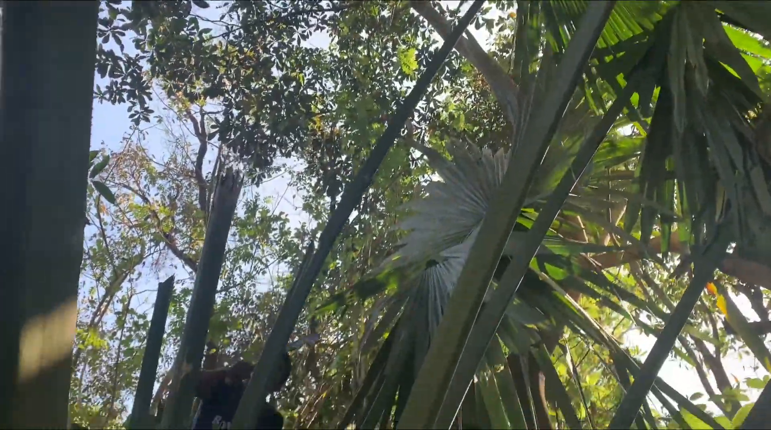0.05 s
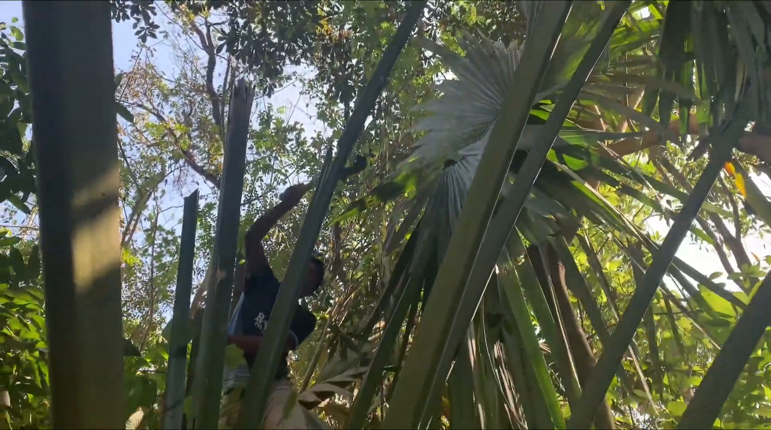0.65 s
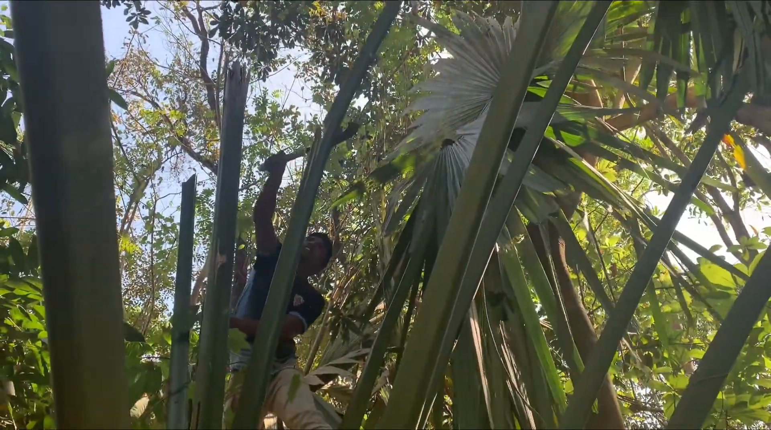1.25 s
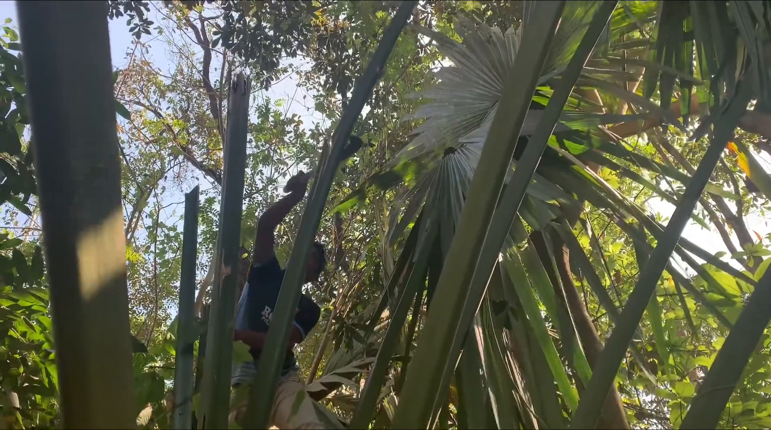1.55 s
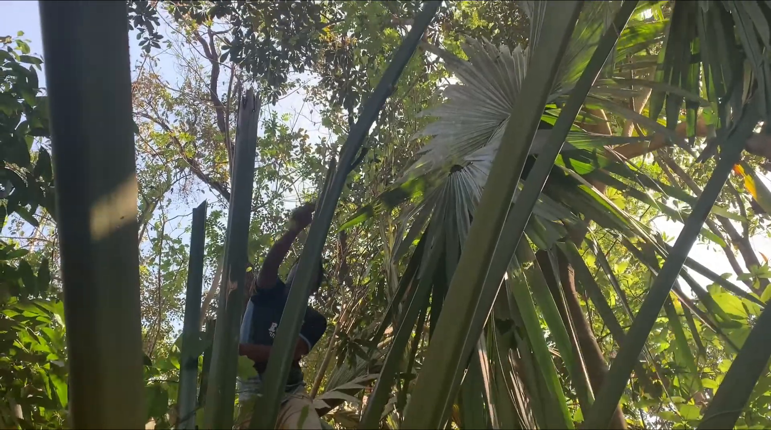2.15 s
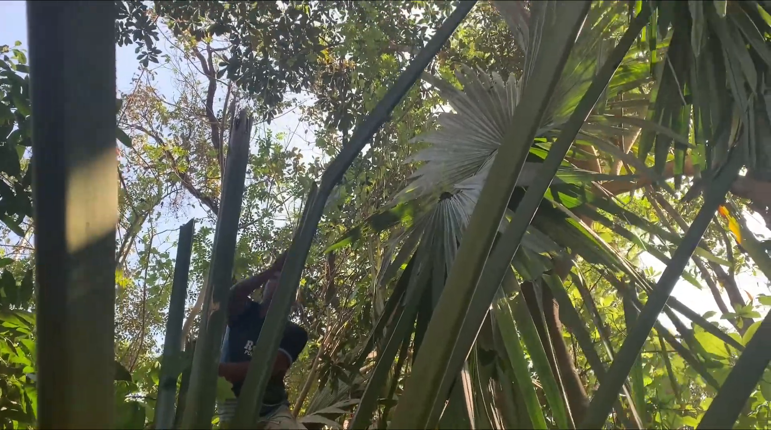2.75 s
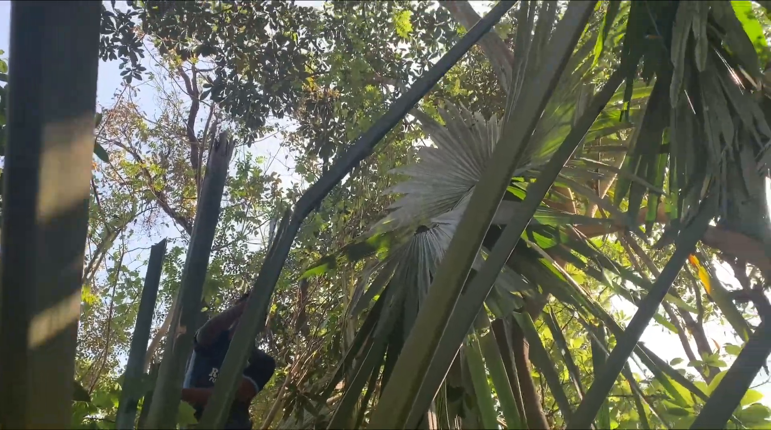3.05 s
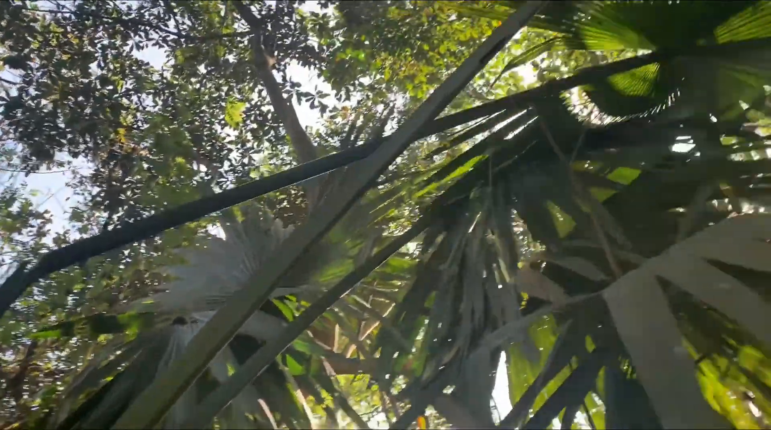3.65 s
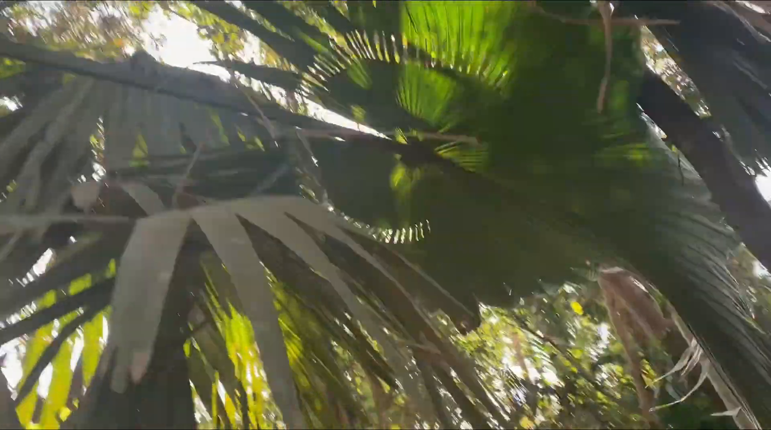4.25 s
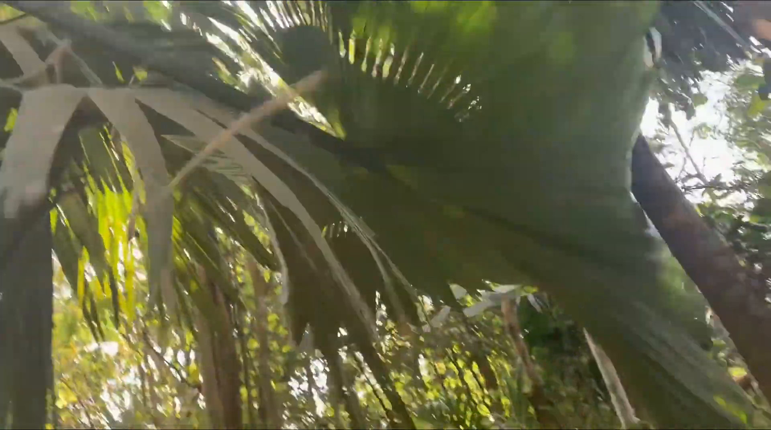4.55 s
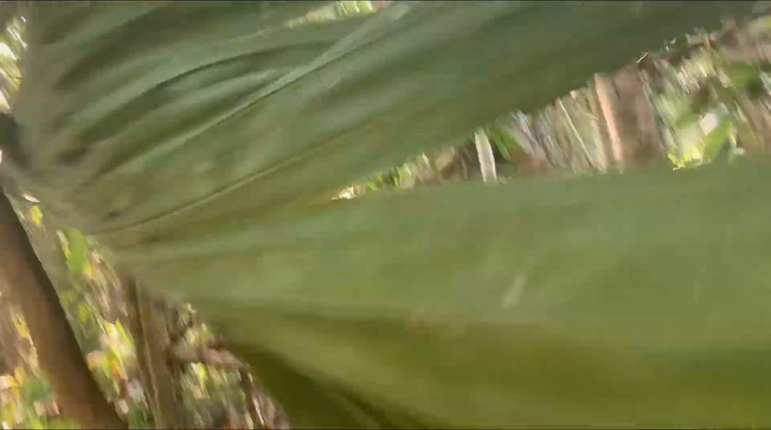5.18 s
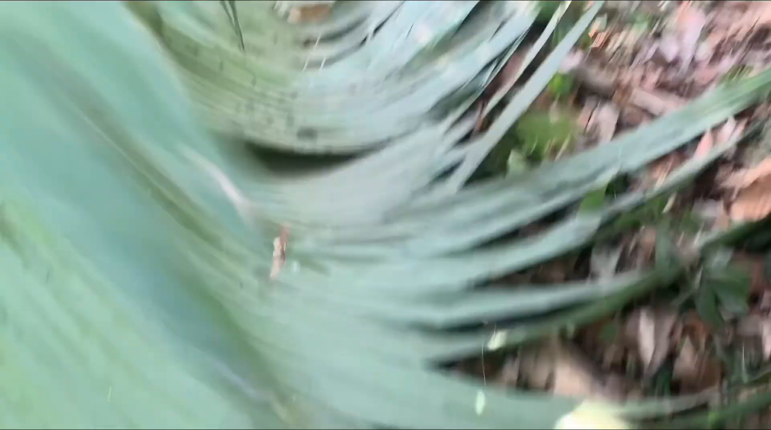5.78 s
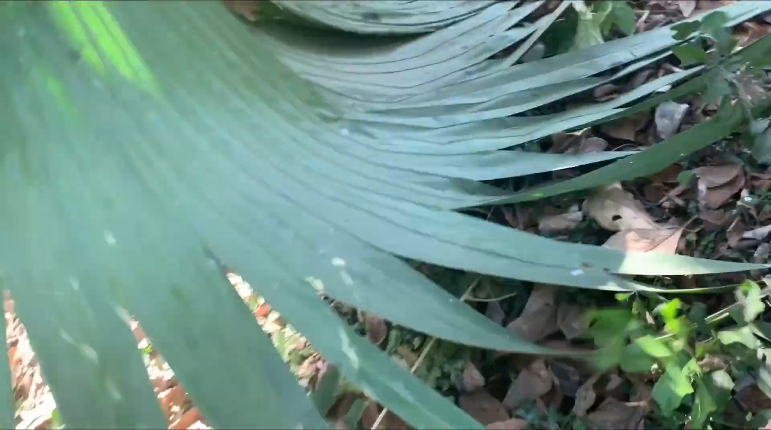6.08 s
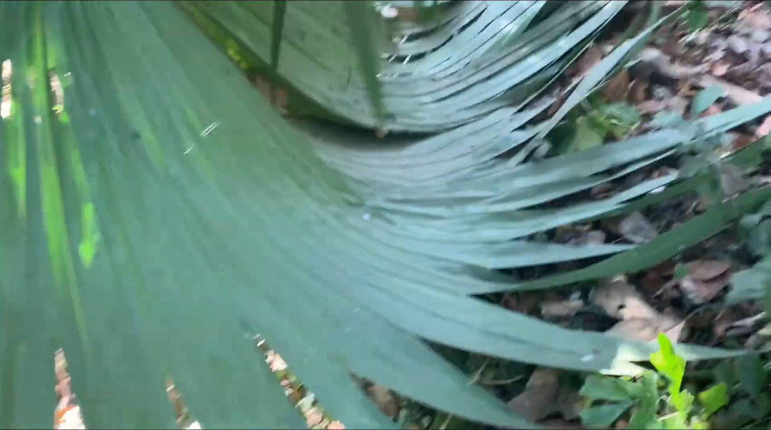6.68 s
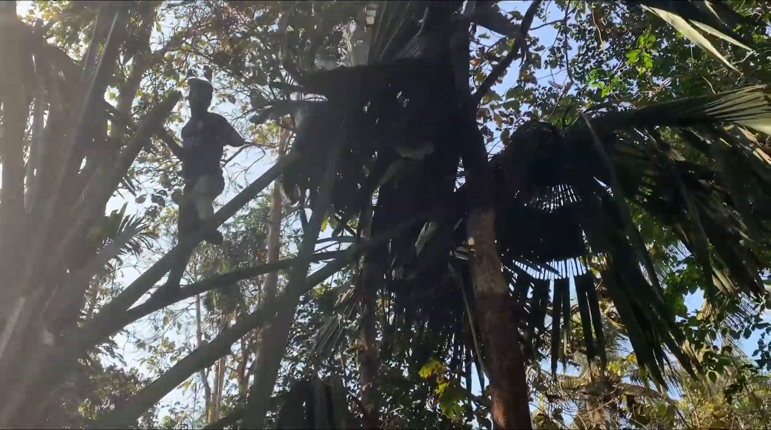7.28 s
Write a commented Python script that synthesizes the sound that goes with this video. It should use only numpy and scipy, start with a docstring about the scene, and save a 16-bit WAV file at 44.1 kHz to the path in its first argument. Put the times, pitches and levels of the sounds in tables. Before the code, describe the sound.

Woody chops and snapping fibres in a forest, then a large palm leaf crashes down through dry fronds close by.

```python
"""Leaves stir and woody knocks grow into a hard chop: someone up a fan palm is cutting a leaf stalk.
The main chops open with a crack of fibres, then a thud; the stalk tears and the big frond falls.
It scrapes down through the dry crown, sweeps past the microphone with puffs of air and settles.
After a brief silence another frond starts to slide. Behind it all lie a light breeze and the low
hum of the forest, with one thin, far-off note near the start."""
import sys
import numpy as np
from scipy import signal
from scipy.fft import rfft, irfft
from scipy.io import wavfile
from scipy.ndimage import uniform_filter1d

SR = 44100
rng = np.random.default_rng(int(sys.argv[2]) if len(sys.argv) > 2 else 0)


def to_wav(s):
    """Save 16-bit WAV."""
    ch = np.atleast_2d(s).T  # columns
    pcm = np.round(np.clip(ch, -1, 1) * 32767)  # PCM
    wavfile.write(sys.argv[1], SR, pcm.astype(np.int16))


N = 327222
TIME = np.arange(N) / SR
BINS = np.fft.rfftfreq(N, 1 / SR)


# blows on the stalk: (time [s], level [dB], pitch [factor], soft-blow roll-off [Hz],
# ring time [factor], mode damped because the blow lands on its node [Hz])
BLOWS = [(0.016, -25.5, 1.07, 535, 0.75, 1150), (0.62, -11.5, 1.054, 316, 0.77, 296),
         (1.296, -0.5, 1.054, 2000, 0.6, 370), (1.601, -30, 1.06, 1500, 0.91, 1150),
         (1.91, -29, 1.09, 1200, 1, 1150), (1.962, -31.5, 1.67, 1500, 0.58, 1150),
         (2.022, -18.5, 0.71, 610, 0.67, 1150), (2.308, -22.5, 1.2, 1500, .9, 1150),
         (2.353, -17, 0.94, 1400, 0.59, 284), (2.398, -15.5, 1.13, 810, 0.58, 192),
         (2.607, -20, 1.35, 2700, 0.52, 1150), (2.634, -13, 1.08, 2500, 0.53, 1150),
         (3.348, -19, 1.18, 2500, 0.76, 1150), (4.239, -14.5, 1.02, 2000, 0.43, 1150)]
# bending modes of the stalk: (base pitch [Hz], level [dB], base t60 [s])
STALK_MODES = [(95.8, 1, 0.14), (117.2, -10, 0.28), (185, 1.5, 0.12), (287, 3, 0.073), (356, -1.5, 0.057),
               (459.6, -7, 0.09), (645, -8.5, 0.033), (1130, -23, 0.042)]
# the chops sit slightly right; rows left, right: (gain [dB])
CHOP_PAN_DB = [
    [-1.5],
    [1.5],
]
def chops(travel_s=0.00423, rise_s=0.0035, reference_hz=200):
    """Each blow bends the stalk; high bending waves travel faster, so the thud sweeps downward."""
    thuds, t = np.zeros(N), TIME[:SR // 2]
    for start, db, pitch, soft_hz, ringing, node_hz in BLOWS:
        for hz, mode_db, t60 in STALK_MODES:
            height = hz * pitch / reference_hz
            age = np.maximum(t - travel_s / np.sqrt(height), 0)
            attack = 1 - np.exp(-(age * height / (2 * rise_s)) ** 2)
            fade = amp(db + mode_db - 60 * age / (t60 * ringing))
            softness = 1 / np.sqrt(1 + (hz / soft_hz) ** 6)
            node_dip = 1 - .75 * np.exp(-(np.log2(hz / node_hz) / .2) ** 2)
            tone = np.sin(2 * np.pi * hz * pitch * age)
            add(thuds, start, attack * fade * softness * node_dip * tone)
    mid, side = forest_echo(np.array([thuds, np.zeros(N)]), wet_db=-13)
    return np.array([mid + side / 2, mid - side / 2]) * amp(CHOP_PAN_DB)


# fibres breaking: (time [s], level [dB], decay [s], woody ring against that level [dB])
FIBRE_SNAPS = [(0.61, -31.5, 0.013, -5), (1.284, -30, 0.003, -6), (1.2874, -12.5, 0.0052, -11.5),
               (1.298, -27.5, 0.033, -4.5), (1.711, -29, 0.0035, -7.5), (1.858, -37, 0.0025, -3),
               (1.957, -30, 0.0025, -5), (2.023, -9.5, 0.00067, -6), (2.107, -27.5, 0.0039, -4),
               (2.144, -32, 0.0053, -9), (2.274, -36, 0.0045, -4), (2.2805, -19, 0.0016, -9),
               (2.293, -34, 0.0061, 1), (2.302, -22, 0.01, -4.5), (2.344, -22, 0.002, -20),
               (2.393, -8, 0.00054, -14), (2.4105, -17, 0.0012, -39), (2.442, -30, 0.0033, -17),
               (2.5423, -19.5, 0.00089, -3), (2.6001, -14.5, 0.00094, -2), (2.6288, -18, 0.0028, 0),
               (2.636, -26, 0.0017, -3), (2.651, -19, 0.002, -9), (2.66, -21, 0.0071, -14),
               (2.684, -15, 0.0028, -23), (2.722, -20, .0015, -15), (2.727, -29, 0.0084, -7),
               (2.753, -22, 0.00087, -14), (2.775, -23.5, 0.006, -14), (2.844, -18, 0.0023, -29),
               (3.348, -9, 0.0015, -6), (3.574, -14.5, 0.0042, -35), (3.655, -20, 0.0025, -10),
               (3.745, -17.5, 0.0085, -27), (3.798, -17.5, 0.0032, -19), (3.8428, -7.5, 0.0023, -6),
               (3.8458, -12.5, 0.012, -13), (3.849, -12, 0.0013, -9), (3.9497, -18.5, 0.0064, -9),
               (4.2782, -6.5, 0.003, -8.5), (4.283, -13.5, 0.0028, -6), (4.296, -11, 0.0016, -5),
               (4.3368, -18, 0.0026, -3), (4.797, -17, 0.0076, -2.5), (6.3167, -19.5, .002, -11),
               (6.38, -19, 0.0041, -16), (6.5073, -19, .002, -4), (6.595, -15, 0.0021, -3.5),
               (6.78, -18, 0.0054, -16), (6.818, -21, 0.0022, -8), (7.011, -34, 0.0043, 21.5)]
# EQ of the bright crack and of its woody body: (frequency [Hz], level [dB])
CRACK_EQ = [(200, -12), (900, -22), (3000, -18.5), (6000, 1), (9000, 7.5), (12000, 3), (15500, 5.5)]
WOOD_EQ = [(400, -16), (1200, -9), (2000, -0.5), (3000, 1), (4500, -0.5), (9000, -37)]
# resonances of the split stalk: (frequency [Hz], width [Hz], level [dB])
SPLIT_MODES = [(1280, 70, -3), (2390, 440, 4)]
def snaps(rise_s=0.0003, brittle_s=.0015, brittle_db=6):
    """A snap is a crack and a quick run of breaking fibres that also rings the split stalk."""
    (crack_gain, wood_gain, clicks), t = np.zeros((3, N)), TIME[:SR // 5]
    for start, db, decay, woody_db in FIBRE_SNAPS:
        burst = amp(db) * (1 - np.exp(-t / rise_s)) * np.exp(-t / decay)
        add(crack_gain, start, burst)
        add(wood_gain, start, burst * amp(woody_db))
        # the shortest snaps open with one clean click
        add(clicks, start, amp([db + brittle_db]) * np.exp(-decay / brittle_s))
    fibres = noise() * grains(per_s=1800, spread_db=1.5, decay_s=.0005, smooth=.68)
    crack = amp(2) * colour(fibres * crack_gain + [clicks, np.zeros(N)], CRACK_EQ)
    body = amp(-4.5) * colour(fibres * wood_gain, WOOD_EQ)
    split = amp(-11.5) * ring(fibres * wood_gain, SPLIT_MODES)
    return forest_echo(crack + body, wet_db=-9) + split


# the frond tips over, drops and settles: (time [s], rubbing [dB], extra blade flap [dB])
FALL_CURVE = [(2.8, -58, 13), (2.9, -41, 4.5), (3.55, -41.5, -7.5), (3.66, -36, 0), (3.8, -36, 3.5),
              (3.97, -41, 5.5), (4.15, -37.5, 5), (4.25, -31, 2.5), (4.379, -45.5, 3.5), (4.56, -31.5, 0),
              (5.0, -33, -1.5), (5.12, -31, -10.5), (5.34, -34.5, 1), (5.51, -31, 0), (5.66, -32, 1),
              (5.918, -28, -1.5), (6.1, -39, 0), (6.401, -41.5, 2), (6.84, -46, -16)]
# rows blades, ribs, tips: (level at middling rubbing [dB], slope [dB per dB of rubbing])
RUB_RESPONSE = [(-36, 0.99), (-36.5, 1.0), (-36.5, 0.67)]
def falling_frond(middling_db=-36, swish_db=1.4, swish_s=.035):
    """Gains of blades, ribs and tips as the frond falls; ribs catch and let go, so it rubs unevenly."""
    times, rub_db, flap_db = np.transpose(FALL_CURVE)
    catching = swish_db * wander(swish_s)
    rub = level(times, rub_db) * amp(catching - middling_db)
    blades, ribs, tips = [amp(db) * rub ** slope for db, slope in RUB_RESPONSE]
    return np.array([blades * level(times, flap_db), ribs, tips])


# jolts and tugs on the stalk: (time [s], level [dB], decay [s], blades offset [dB], tips offset [dB])
JOLTS = [(0.0, -52, 0.19, 1, 0.5), (0.25, -57, 0.18, 1, 8.5), (0.62, -62.5, 0.28, 3, 1),
         (1.29, -43, 0.19, 13, -4.5), (1.59, -54.5, 0.86, 7.5, 2), (1.997, -50, 0.076, 14.5, 16),
         (2.289, -51.5, 0.22, 11.5, 7), (2.623, -41, 0.099, 6, 9), (2.82, -52, 0.25, 14, 17),
         (7.207, -30.5, 0.16, 1.5, -5)]
def shaken_crown(rise_s=0.004):
    """Gains of blades, ribs and tips: each jolt sets them going, and they calm down again."""
    power = np.zeros((3, N))
    for start, db, decay, blades_db, tips_db in JOLTS:
        age = np.maximum(TIME - start, 0)
        jolt = (1 - np.exp(-age / rise_s)) * np.exp(-age / decay)
        power += (amp([[db + blades_db], [db], [db + tips_db]]) * jolt) ** 2
    return np.sqrt(power)


CREEP_START_S = 6.87
# the second frond; rows blades, ribs, tips: (creeping level [dB], full-speed level [dB])
SECOND_FROND_DB = [(-50.5, -29.5), (-44.5, -20.5), (-49, -27.5)]
def second_frond(give_way_s=7.19, speed_up_s=0.12):
    """Gains of blades, ribs and tips as another frond creeps, gives way and picks up speed."""
    speed = np.clip((TIME - give_way_s) / speed_up_s, 0, 1)
    gains = np.array([amp(slow + (fast - slow) * speed) for slow, fast in SECOND_FROND_DB])
    return gains * (TIME > CREEP_START_S)


# rustle bed in the light breeze: (blades [dB], ribs [dB], tips [dB])
BREEZE_DB = (-63.5, -61, -92)
# leaflets sliding as they settle: (peak time [s], level [dB], rise [s], fall [s])
LEAFLET_SLIDES = [(4.81, -35, 0.017, 0.04), (5.11, -34, 0.06, 0.099), (5.51, -31.5, 0.05, 0.058),
                  (5.78, -24, 0.049, 0.083), (6.55, -32, 0.27, 0.14)]
# EQ of the low flap, mid scrape, crisp crackle and hissing slide: (frequency [Hz], level [dB])
FLAP_EQ = [(30, -72), (70, -7), (120, 0), (200, 0), (310, 1), (500, -6.5), (800, -13), (1600, -28)]
SCRAPE_EQ = [(150, -56), (400, -3), (700, -1.5), (1400, -2.5), (2200, -3), (3500, -10), (6000, -21.5),
             (14000, -19)]
CRACKLE_EQ = [(800, -55), (2500, -7.5), (4200, 2), (6000, -1), (8500, 3), (11000, 0.5), (13500, -3.5),
              (15500, -6.5)]
SLIDE_EQ = [(1200, -14), (2600, -1), (4000, 0.5), (5500, -3.5), (9000, -6.5)]
def leaves():
    """Broad blades flap, ribs scrape over each other, dry tips tick and leaflets slide."""
    breeze = amp(BREEZE_DB)[:, None]
    power = breeze ** 2 + shaken_crown() ** 2 + falling_frond() ** 2 + second_frond() ** 2
    blades, ribs, tips = np.sqrt(power)
    sliding = swells(LEAFLET_SLIDES) + amp(-39) * (TIME > CREEP_START_S)
    flapping = grains(per_s=300, spread_db=1.8, decay_s=.005, smooth=.65)
    scraping = grains(per_s=1400, spread_db=2.1, decay_s=.003, smooth=.68)
    ticking = grains(per_s=1600, spread_db=2.6, decay_s=.001, smooth=.6)
    flap = colour(leaf_hiss(patchy_db=3) * flapping * blades, FLAP_EQ)
    scrape = colour(leaf_hiss(patchy_db=3) * scraping * ribs, SCRAPE_EQ)
    crackle = colour(leaf_hiss(patchy_db=2.3) * ticking * tips, CRACKLE_EQ)
    slide = colour(leaf_hiss(patchy_db=3) * scraping * sliding, SLIDE_EQ)
    return amp(2.5) * flap + amp(3.5) * scrape + amp(4.5) * crackle + amp(4) * slide


def leaf_hiss(patchy_db):
    """Two noises with shared narrow, short patches, as different leaflets ring in turn."""
    spectra = signal.stft(noise(), nperseg=1024, noverlap=768)[2]
    patches = uniform_filter1d(rng.standard_normal(spectra.shape[1:]), size=4, axis=0)
    patches = unit(uniform_filter1d(patches, size=9, axis=1))
    hiss = signal.istft(spectra * amp(patchy_db * patches), nperseg=1024, noverlap=768)[1]
    return unit(hiss[:, :N])


# each broad fan dragging over its neighbours: (time [s], level [dB])
DRAG_CURVE = [(4.44, -32.5), (4.52, -25.5), (4.57, -26.5), (4.68, -28.5), (4.85, -35.5), (5.1, -74),
              (7.18, -66), (7.25, -32), (7.36, -24), (7.42, -23)]
# resonances of the fan: (frequency [Hz], width [Hz], level [dB])
FAN_MODES = [(503, 240, -2), (1000, 190, -4.5), (1440, 240, -3)]
def fan_drag(flex_share=.022, flex_s=.16):
    """Ribs catch and slip on the pleated fan, a stiff sheet whose ring wavers in pitch as it flexes."""
    slips = noise() * grains(per_s=1400, spread_db=1.8, decay_s=.002, smooth=.75)
    flexed_clock = np.cumsum(1 + flex_share * wander(flex_s))
    sheet = [np.interp(flexed_clock, np.arange(N), side, period=N) for side in ring(slips, FAN_MODES)]
    return np.array(sheet) * level(*np.transpose(DRAG_CURVE))


# gusts from the passing fan: (peak time [s], level [dB], rise [s], fall [s])
GUSTS = [(5.81, -24, 0.036, 0.045), (5.94, -17.5, 0.023, 0.025), (6.03, -23, 0.027, 0.017),
         (6.24, -38, 0.051, 0.039), (6.64, -31, 0.054, 0.03), (6.76, -23, 0.032, 0.04)]
# EQ of their rumble: (frequency [Hz], level [dB])
GUST_EQ = [(15, -30), (28, -9), (45, -1), (80, 0.5), (150, -8), (300, -17), (900, -48)]
# single puffs: (time [s], level [dB], pitch [Hz], decay [s])
PUFFS = [(5.928, -20, 58, 0.015), (6.631, -23.5, 293, 0.0036), (6.744, -15, 112, 0.012),
         (6.75, -12.5, 272, 0.0054), (6.772, -22, 71, 0.035), (6.811, -14.5, 56.5, 0.016)]
def pushed_air():
    """The passing fan pushes turbulent air and a few single puffs at the microphone."""
    air, t = amp(1) * colour(noise(), GUST_EQ) * swells(GUSTS), TIME[:SR // 5]
    for start, db, hz, decay in PUFFS:
        add(air[0], start, amp(db) * np.exp(-t / decay) * np.sin(2 * np.pi * hz * t))
    return air


# woody taps of dry ribs and stalks: (time [s], level [dB], pitch [Hz], decay [s])
RIB_TAPS = [(0.0456, -36.5, 1370, 0.0044), (0.094, -40.5, 1460, 0.0055), (0.162, -40, 1140, .005),
            (0.174, -34, 1730, 0.0044), (0.2424, -31, 1630, 0.0052), (0.312, -39, 1520, .005),
            (0.338, -38, 850, 0.0059), (0.388, -33, 2780, 0.0044), (0.639, -38.5, 1250, 0.0053),
            (1.288, -29, 1150, .007), (1.302, -25, 786, .009), (1.393, -36, 634, 0.01),
            (1.425, -36, 1290, 0.011), (1.577, -34.5, 1370, 0.0085), (1.608, -37, 1240, 0.0065),
            (1.714, -38, 1160, 0.0075), (1.726, -36, 1384, .008), (1.825, -37, 1360, 0.0071),
            (1.917, -34.5, 1254, .01), (2.306, -36, 1220, 0.0049), (2.402, -31.5, 752, 0.0075),
            (2.607, -28.5, 1244, 0.014), (2.561, -38, 1290, 0.011), (2.639, -25, 1250, 0.0065),
            (2.808, -34, 1260, 0.011), (3.35, -25.5, 1150, 0.0083), (3.846, -13, 2304, 0.0071),
            (7.013, -25, 2380, .008)]
# modes of a rib: (pitch [factor], level [dB])
RIB_MODES = [(.62, -12), (.87, -12.5), (1, -3), (1.27, -14), (1.7, -12.5)]
# EQ of the dry rattle: (frequency [Hz], level [dB])
RATTLE_EQ = [(300, -19), (1300, 0), (2500, -6), (4700, -8), (9000, -16)]
def rib_taps(decay_share=0.93):
    """Each tap rings a rib briefly at its own pitch, with a little rattle; the side modes die sooner."""
    taps, t = np.zeros(N), TIME[:SR // 12]
    for start, db, hz, decay in RIB_TAPS:
        for ratio, mode_db in RIB_MODES:
            life = decay * decay_share ** abs(np.log2(ratio))
            add(taps, start, amp(db + mode_db) * np.exp(-t / life) * np.sin(2 * np.pi * hz * ratio * t))
    rattle = np.abs(signal.hilbert(taps)) * colour(noise(), RATTLE_EQ)
    return forest_echo(np.array([taps, np.zeros(N)]) + amp(-5) * rattle, wet_db=-8)


# EQ of the brittle ticks and of the papery crinkle: (frequency [Hz], level [dB])
TICK_EQ = [(800, -20), (2000, -4), (5000, 0), (9000, 4), (12000, -1), (15500, -7)]
CRINKLE_EQ = [(700, -13), (2000, 0), (5000, -1), (9000, -3), (12000, -13), (15500, -22)]
def ticks_and_crinkle(tear_from_s=2.6, tear_to_s=4.35):
    """Tips and fibres flick as the stalk jolts and tears; dry leaflets buckle in clumps in the fall."""
    flicks = noise() * grains(per_s=90, spread_db=3, decay_s=.0011, smooth=0)
    tearing = amp(-44.5) * (TIME > tear_from_s) * (TIME < tear_to_s)
    clumps = grains(per_s=30, spread_db=1, decay_s=.025, smooth=.1)
    buckling = noise() * clumps * grains(per_s=170, spread_db=2, decay_s=.0009, smooth=0)
    falling_tips, shaken_tips = falling_frond()[2], shaken_crown()[2]
    crinkle = colour(buckling * falling_tips * amp(-6), CRINKLE_EQ)
    ticks = colour(flicks * (amp(-5) * shaken_tips + tearing), TICK_EQ)
    return crinkle + ticks


# fader curve of the far-off note: (time [s], level [dB])
NOTE_CURVE = [(.09, -50), (.14, -55.5), (.2, -59), (.36, -63), (.41, -60), (.44, -53)]
def far_note(hz=2936, width_hz=90):
    """A faint bird or insect holds one narrow, wavering whistle, blurred by distance."""
    return ring(noise(), [(hz, width_hz, 0)]) * level(*np.transpose(NOTE_CURVE))


# EQ of the forest bed: (frequency [Hz], level [dB])
FOREST_EQ = [(20, -7), (45, -3.5), (72, 2), (130, -16.5), (300, -14), (1000, -30.5), (3500, -26.5),
             (8000, -35), (15000, -72)]
def forest_hum():
    """The forest's steady low hum, with a trace of hiss above it."""
    return amp(-50) * colour(noise(), FOREST_EQ)


# reverb among the trees: (frequency [Hz], t60 [s])
ECHO_DECAY = [(100, 0.42), (300, 0.2), (1000, 0.084), (4000, 0.18), (14000, 0.044)]
def forest_echo(x, wet_db, echoes_per_s=3000, build_s=0.0044):
    """Trunks and foliage scatter the first signal into both; the bass lingers longest."""
    echoes = rng.standard_normal((2, SR)) * (rng.random((2, SR)) < echoes_per_s / SR)
    hz, t, spectra = signal.stft(echoes, SR, nperseg=256)
    fade = amp(-60 * t / curve_at(ECHO_DECAY, hz)[:, None])
    tail = signal.istft(spectra * fade, SR, nperseg=256)[1][:, :SR]
    tail *= 1 - np.exp(-TIME[:SR] / build_s)
    tail /= np.linalg.norm(tail[0])
    return x + amp(wet_db) * signal.fftconvolve(x[:1], tail, axes=1)[:, :N]


# stereo image of the two microphone ports: (frequency [Hz], likeness [0-1])
PORT_LIKENESS = [(100, .96), (250, .94), (450, .8), (1000, .78), (2000, .15), (6000, .05), (7500, .52),
                 (9200, .86), (11500, .96), (15000, .93)]
# their balance: (frequency [Hz], right over left [dB])
PORT_BALANCE = [(50, 2), (250, 3), (1000, 1.4), (3000, 1), (6000, 2.5), (9000, -1), (15000, 0)]
def microphone_ports(x, lead_ms=0.2158, treble_hz=2300):
    """Left hears the first signal; right hears a blend of both, the shared treble a little earlier."""
    left, other = rfft(x)
    likeness, balance_db = curve_at(PORT_LIKENESS, BINS), curve_at(PORT_BALANCE, BINS)
    lead = np.exp(2j * np.pi * BINS * lead_ms / 1000 * (BINS > treble_hz))
    right = likeness * left * lead + np.sqrt(1 - likeness ** 2) * other
    return irfft(np.array([left * amp(-balance_db / 2), right * amp(balance_db / 2)]), N)


def grains(per_s, spread_db, decay_s, smooth):
    """Envelope of many tiny contacts, a few of them large, over a smooth share of distant ones."""
    sizes = amp(spread_db * np.minimum(rng.exponential(1, N), 4.5))
    contacts = sizes * (rng.random(N) < per_s / SR)
    power = signal.lfilter([1], [1, -np.exp(-2 / (decay_s * SR))], contacts ** 2)
    return np.sqrt(smooth + (1 - smooth) * power / power.mean())


def swells(rows):
    """Gain over time of swells that grow to a peak and die away."""
    return sum(amp(db) * np.exp(-np.maximum((peak - TIME) / rise, (TIME - peak) / fall))
               for peak, db, rise, fall in rows)


def wander(bump_s):
    """Smooth random movement of rms 1, with bumps about bump_s long."""
    return unit(signal.oaconvolve(rng.standard_normal(N), np.hanning(round(bump_s * SR)), "same"))


def ring(x, modes):
    """Passes a sound through a few resonances, keeping the power of white noise."""
    response = sum(amp(db) / (1 + 2j * (BINS - hz) / width) ** 2 for hz, width, db in modes)
    return irfft(rfft(x) * response / np.sqrt(np.mean(np.abs(response) ** 2)), N)


def colour(x, eq):
    """Filters by an EQ curve, keeping the power of white noise."""
    return irfft(rfft(x) * unit(amp(curve_at(eq, BINS))), N)


def curve_at(points, hz):
    """Reads a curve over frequency, joined on a log axis."""
    frequencies, values = np.transpose(points)
    return np.interp(np.log(hz + 1), np.log(frequencies + 1), values)


def level(times, db):
    """Gain over time from a fader curve, silent outside it."""
    return amp(np.interp(TIME, times, db, left=-120, right=-120))


def add(mix, start_s, sound):
    """Mixes a sound in at its start time."""
    part = mix[..., max(round(start_s * SR), 0):][..., :sound.shape[-1]]
    part += sound[..., :part.shape[-1]]


def noise():
    """Two independent white noises."""
    return rng.standard_normal((2, N))


def amp(db):
    """Decibels to gain."""
    return 10 ** (np.asarray(db) / 20)


def unit(x):
    """Scales to rms 1."""
    return x / np.sqrt(np.mean(x ** 2) + 1e-20)


def scene():
    """The chops, the breaking stalk and the falling fronds over the forest bed."""
    bed = forest_hum()
    blows = chops()
    palm = snaps() + rib_taps() + leaves() + ticks_and_crinkle() + fan_drag() + pushed_air()
    return blows + microphone_ports(palm + far_note() + bed)


def record(dry, low_cut_hz=32, ceiling=.92, high_cut_hz=15650):
    """Deep bass and top treble fall away and peaks are rounded; for an instant the sound drops out."""
    trimmed = signal.sosfilt(signal.butter(2, low_cut_hz, "highpass", fs=SR, output="sos"), dry)
    rounded = trimmed / (1 + (trimmed / ceiling) ** 8) ** (1 / 8)
    # a quick fade-in, and the sound drops out for an instant at 6.84 s
    gate = np.interp(TIME, [0, .003, .012, 6.836, 6.840, 6.8755, 6.8765], [0, .1, 1, 1, 0, 0, 1])
    high_cut = signal.firwin(255, high_cut_hz, window=("kaiser", 8), fs=SR)
    return signal.oaconvolve(rounded * gate, high_cut[None], "same")


dry = scene()
out = record(dry)
to_wav(out)
```